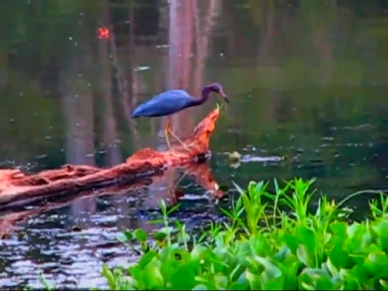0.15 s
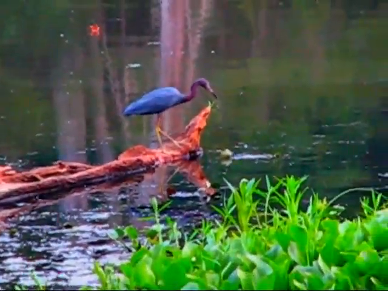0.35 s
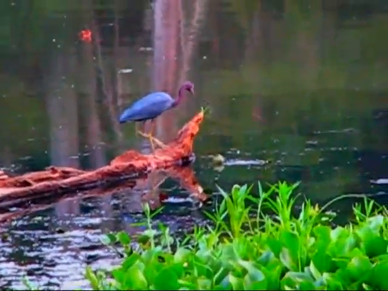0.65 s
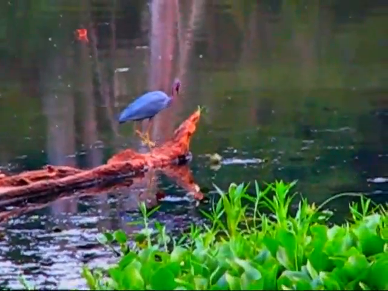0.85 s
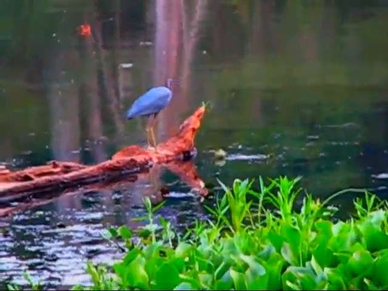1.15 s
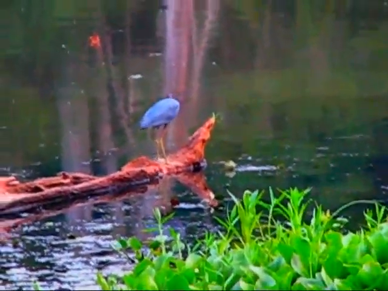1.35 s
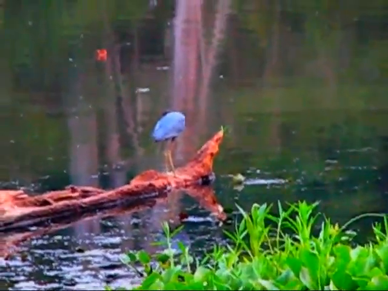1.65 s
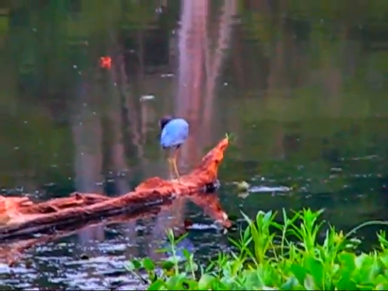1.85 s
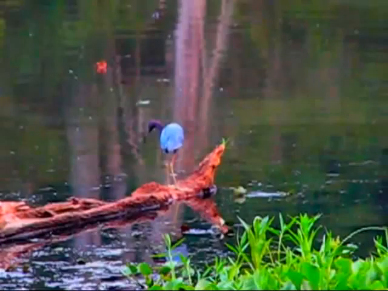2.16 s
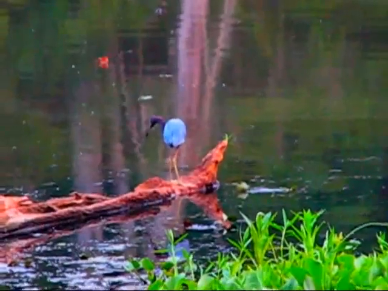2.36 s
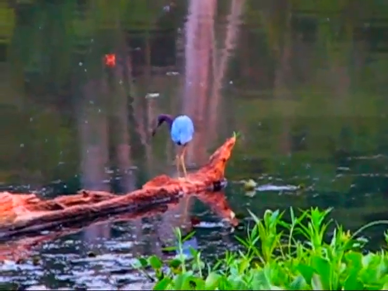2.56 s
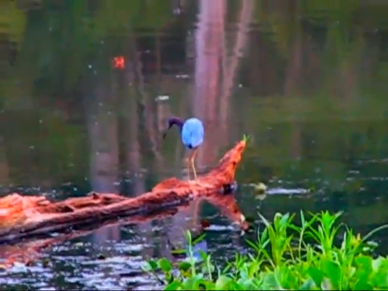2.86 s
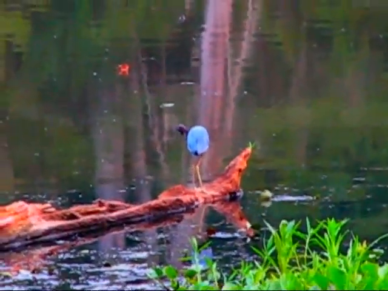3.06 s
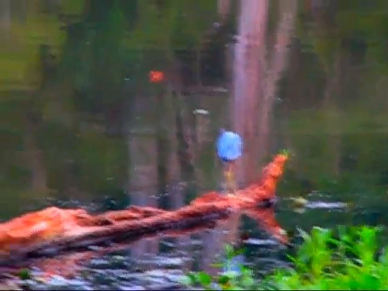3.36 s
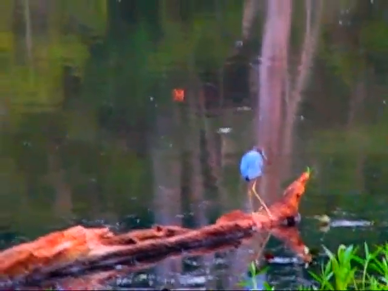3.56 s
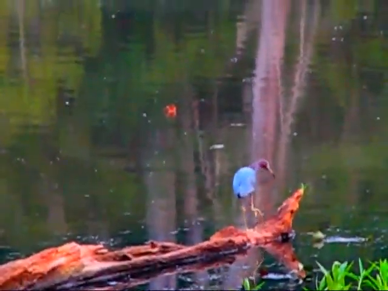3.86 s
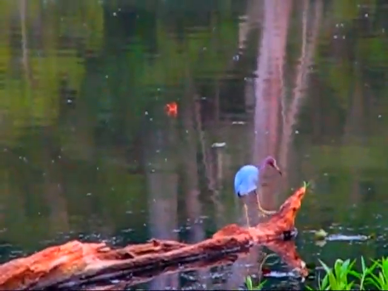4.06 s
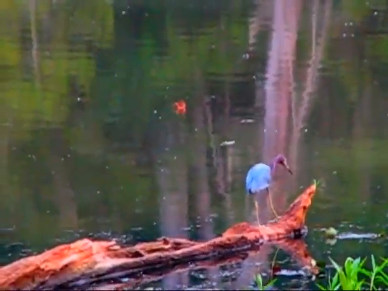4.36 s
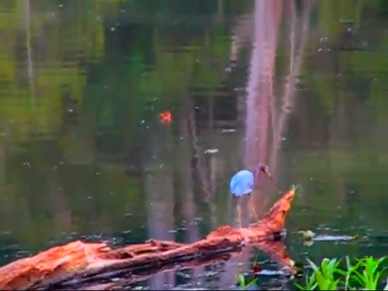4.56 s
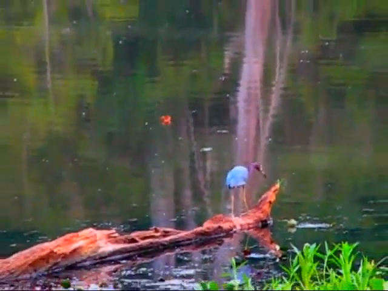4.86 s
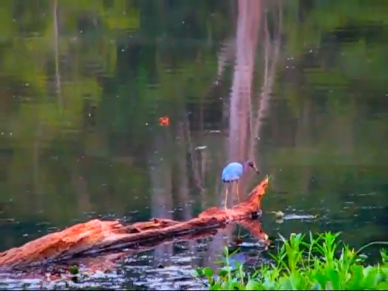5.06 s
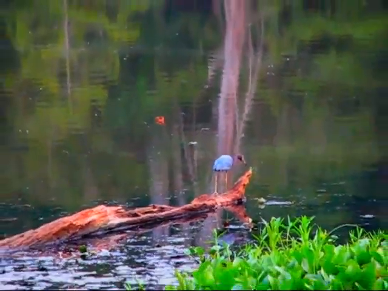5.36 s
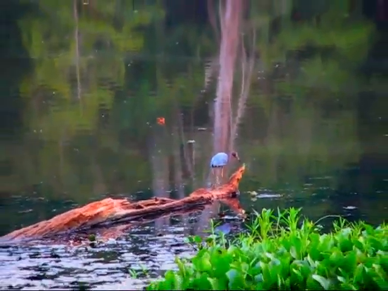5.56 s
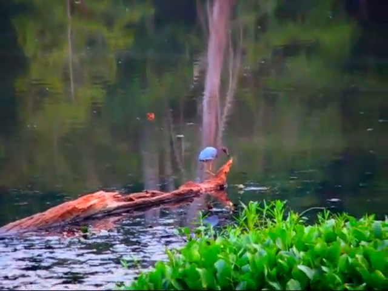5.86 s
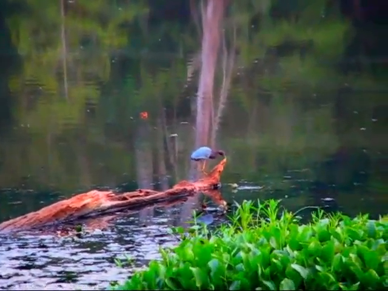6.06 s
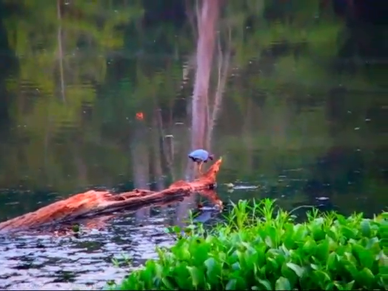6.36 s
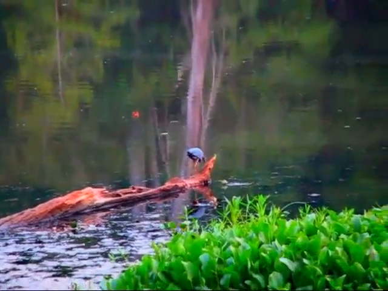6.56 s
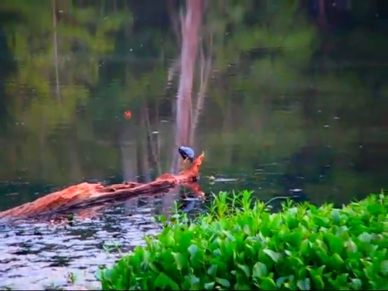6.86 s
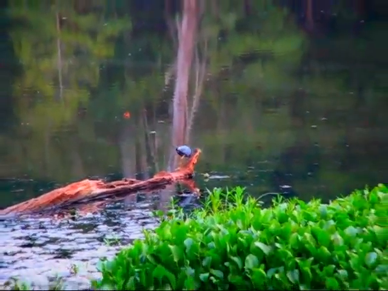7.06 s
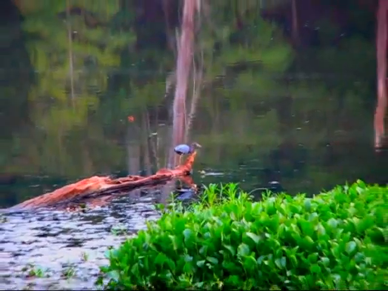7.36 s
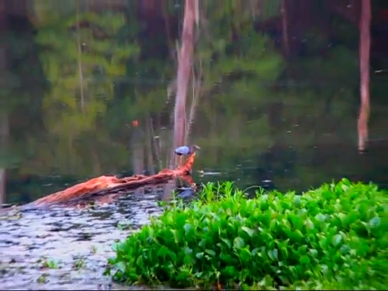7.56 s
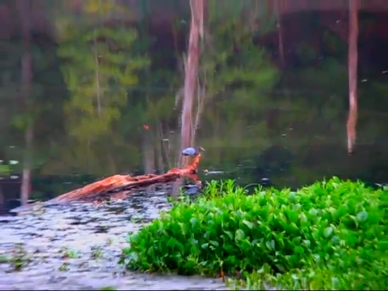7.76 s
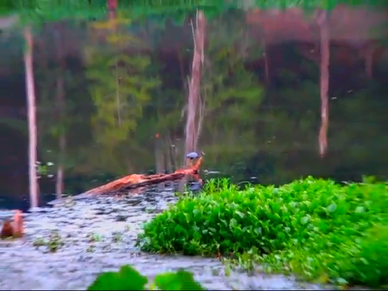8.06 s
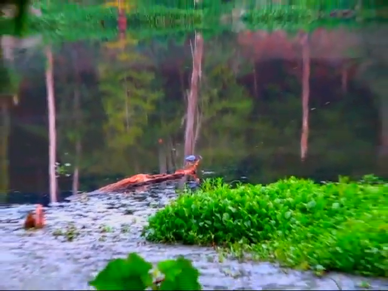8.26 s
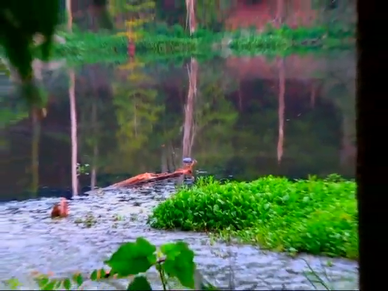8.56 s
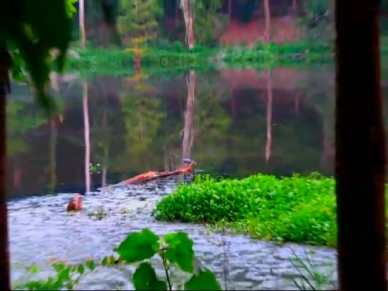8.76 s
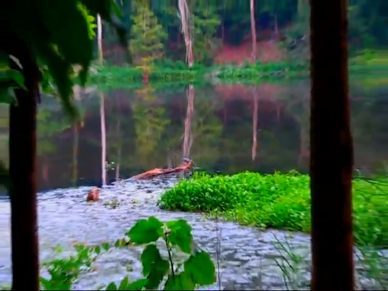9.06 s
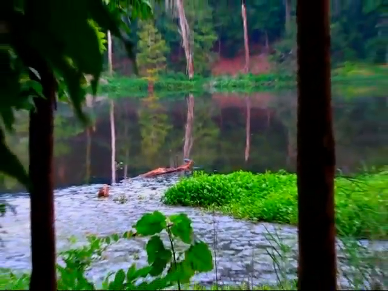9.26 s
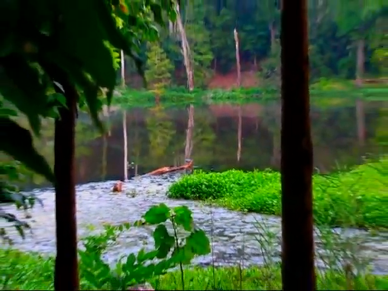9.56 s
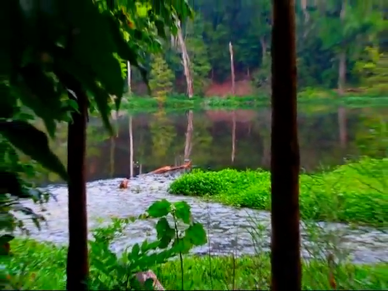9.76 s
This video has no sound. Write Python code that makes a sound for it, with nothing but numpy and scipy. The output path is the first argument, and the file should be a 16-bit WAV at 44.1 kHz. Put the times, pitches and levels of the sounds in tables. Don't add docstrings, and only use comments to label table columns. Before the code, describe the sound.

A continuous, bright insect chorus fills the pond edge, with buzzing cicadas, rapid cricket trilling and very high katydid rasps. Tree frogs give brief reedy chirps over blurred distant callers. Air noise stays very low, with slight gusts. In the later part, close handling clicks lead into a low, uneven zoom-motor whirr with regular gear ticks, and tiny bird whistles appear just before the end.

```python
import sys
import numpy as np
from scipy import signal
from scipy.fft import next_fast_len
from scipy.io import wavfile
from scipy.ndimage import uniform_filter1d

SR = 44100
rng = np.random.default_rng(int(sys.argv[2]) if len(sys.argv) > 2 else 0)


def digitize_waveform(pressure):
    field = np.atleast_2d(pressure).T
    bounded = np.clip(field, -1, 1)
    quanta = np.round(bounded * 32767).astype(np.int16)
    wavfile.write(sys.argv[1], SR, quanta)


N = 437031

# start_s [s], strokes_per_s [1/s]
WING_BEAT = [(.3, 49.7), (.7, 50), (1.1, 49.8), (1.9, 48.7), (2.7, 49.4), (3.1, 51.1), (3.5, 51.7),
             (4.7, 51.6), (5.5, 52.2), (6.3, 51.5), (6.7, 52.4), (7.9, 51.4), (9.1, 52.3), (9.9, 52)]


def gain_of(db):
    return 10 ** (np.asarray(db) / 20)


def evened(x):
    return x / np.sqrt(np.mean(x ** 2) + 1e-20)


def read(points, hz):
    f, value = np.transpose(points)
    return np.interp(np.log(hz + 1), np.log(f + 1), value)


def curve(rows, index):
    rows = np.array(rows)
    return np.interp(np.arange(N) / SR, rows[:, 0], rows[:, index])


def drift(hz):
    low_pass = signal.butter(2, hz, fs=SR, output="sos")
    return evened(signal.sosfilt(low_pass, rng.standard_normal(N)))


def resonate(x, hz, width):
    return signal.lfilter(*signal.iirpeak(hz, hz / width, SR), x)


def resonate_twice(x, hz, width):
    return resonate(resonate(x, hz, width), hz, width)


def bend(x, shift_hz):
    length = x.shape[-1]
    whole = signal.hilbert(x, next_fast_len(length))[..., :length]
    return (whole * np.exp(2j * np.pi * np.cumsum(shift_hz) / SR)).real


def panned(x, db):
    return x * gain_of([[db / 2], [-db / 2]])


def add(mix, s, sound):
    part = mix[:, round(s * SR):][:, :sound.shape[1]]
    part += sound[:, :part.shape[1]]


def song(start, end, db, swell, fade):
    t = np.arange(N) / SR
    away = np.maximum(start - t, 0) / swell + np.maximum(t - end, 0) / fade
    return gain_of(db - 18 * away)


def wash(spectrum, patchy_db):
    # pitch_hz [Hz], likeness [0 to 1]
    likeness = [(30, .55), (130, 0.27), (250, 0.53), (600, 0.35), (1200, 0.82), (2500, 0.29), (5500, 0.28),
                (15000, 0.15)]
    # pitch_hz [Hz], left_minus_right_db [dB]
    lean = [(60, 0.5), (250, 0.5), (1000, 3), (2500, -2.5), (4000, 6.5), (5000, 6.5), (9500, -11),
            (13000, 7)]
    frames, hz = N // 256 + 5, np.fft.rfftfreq(1024, 1 / SR)
    a, b, c, d, patches = rng.standard_normal((frames, 513, 5)).T
    patches = evened(uniform_filter1d(uniform_filter1d(patches, size=8, axis=0), size=20, axis=1))
    same = np.clip(read(likeness, hz), -1, 1)[:, None]
    left = a + 1j * b
    right = same * left + np.sqrt(1 - same ** 2) * (c + 1j * d)
    z = np.array([left, right])
    z *= gain_of(read(spectrum, hz)[:, None] + patchy_db * patches)
    z *= gain_of(np.outer([.5, -.5], read(lean, hz)))[:, :, None]
    return evened(signal.istft(z, nperseg=1024, noverlap=768)[1][:, :N])


def across_water(x, t60, wet_db):
    t = np.arange(SR // 2) / SR
    signs = rng.choice([-1., 1.], (2, len(t)))
    taps = signs * (rng.random((2, len(t))) < 2000 / SR) * gain_of(-60 * t / t60)
    taps /= np.linalg.norm(taps[0])
    return x + gain_of(wet_db) * signal.fftconvolve(x.mean(0)[None], taps, axes=1)[:, :N]


def cicadas():
    # start_s [s], level_db [dB]
    effort = [(0, -22.5), (.6, -20.5), (2.3, -22), (3, -20.5), (5.2, -19.5), (6.1, -20.5), (7.9, -19),
              (9.91, -20.5)]
    # pitch_hz [Hz], level_db [dB per Hz]
    wash_spectrum = [(2240, -33.5), (3800, -13.5), (4830, -3.5), (6140, -1.5), (7180, -6), (7990, -9),
                     (8310, -8.5), (8690, -12.5), (8960, -15.5), (11000, -18.5), (14300, -21),
                     (22000, -120)]
    # pitch_hz [Hz], width_hz [Hz], clicks_per_s [1/s]
    males = [
        (4380, 500, 240),
        (4720, 250, 205),
        (5505, 140, 250),
        (6226, 360, 190),
    ]
    # start_s [s], end_s [s], level_db [dB], swell_s [s], fade_s [s]
    male_songs = [
        [(0, .03, -13, .1, .2), (.4, 2.4, -17, .4, .4), (8.7, 9.9, -18, 1.4, .1)],
        [(.4, 1.35, -21, .5, .9), (2.25, 2.32, -21, 2, .3), (3, 8.8, -25, 3, 3), (8.7, 8.9, -23, 3, 2.5)],
        [(0, .03, -17, .1, .3), (.2, 2.32, -19.5, .5, .15), (8.7, 9.2, -26, 6, 4)],
        [(0, .16, -20, .1, .5), (3.2, 5.3, -25, 1.3, 3), (6.8, 8.8, -25, 3, 1.6)],
    ]
    # start_s [s], pitch_hz [Hz]
    warm_up = [(0, 5050), (.6, 5380), (1.6, 5560), (2.4, 5580)]
    out = gain_of(curve(effort, index=1) + 1.66) * wash(wash_spectrum, patchy_db=1.0)
    tymbal_hz, tymbal_depth = 238, .12
    buzz = np.sin(2 * np.pi * np.cumsum(tymbal_hz * (1 + .06 * drift(25))) / SR)
    out *= 1 + tymbal_depth * buzz
    for k, ((hz, width, rate), songs) in enumerate(zip(males, male_songs)):
        turns = np.cumsum(rate * (1 + .15 * drift(60))) / SR
        clicks = np.diff(np.floor(turns), prepend=0) + 0.048 * rng.standard_normal((2, N))
        voice = evened(resonate_twice(clicks, hz, width))
        if k == 2:
            voice = bend(voice, curve(warm_up, index=1) - hz)
        out += gain_of(-9.5) * np.max([song(*row) for row in songs], axis=0) * voice
    return out


def strokes(rate, hz, fall_hz, duty, uneven_db, loose_hz):
    turns = np.cumsum(rate) / SR
    u = turns % 1 / duty
    through = np.minimum(u, 1)
    size_db, detune = rng.standard_normal((700, 2))[turns.astype(int)].T
    pitch_hz = hz + loose_hz * detune + fall_hz * (.5 - through)
    tone = np.sin(2 * np.pi * np.cumsum(pitch_hz) / SR)
    swell = abs(np.sin(np.pi * through)) ** .72 * (u < 1)
    return evened(tone * swell * gain_of(uneven_db * size_db))


def crickets():
    # start_s [s], level_db [dB]
    trill = [(0.0, -28), (3.06, -23.5), (5.55, -23.5), (5.63, -26), (5.77, -23), (5.99, -25), (8.03, -25),
             (9.63, -26.5), (9.91, -26)]
    # pitch_hz [Hz], strokes_per_s [1/s], level_db [dB]
    far_singers = [
        (7820, 54, -38),
        (8003, 47, -37),
        (8134, 50, -35),
        (8281, 57, -39),
        (8500, 53, -44),
    ]
    near = strokes(curve(WING_BEAT, index=1), hz=7920, fall_hz=1050, duty=.55, uneven_db=.7, loose_hz=40)
    near = gain_of(curve(trill, index=1) - 1.5) * near
    echo_s, echo_db = .0021, -12
    near = near + gain_of(echo_db) * np.roll(near, round(echo_s * SR))
    far = np.zeros(N)
    for hz, rate, db in far_singers:
        level = gain_of(db + .3 * drift(1.5))
        wings = rate * (1 + .03 * drift(1.2))
        far += level * strokes(wings, hz=hz, fall_hz=60, duty=.8, uneven_db=1.2, loose_hz=8)
    near = across_water(panned(near, -3.2), t60=0.45, wet_db=-39)
    return near + across_water(panned(far, 1.2), t60=0.24, wet_db=-6.0)


def katydids():
    # start_s [s], level_db [dB]
    effort = [(0, -33), (.6, -33.5), (2.3, -28), (3, -28.5), (4.66, -32.5), (5.2, -28.5), (6, -29.5),
              (6.4, -31), (8.5, -35.5), (9.91, -32.5)]
    # pitch_hz [Hz], level_db [dB per Hz]
    rasp_spectrum = [(6350, -29), (10800, -4), (11200, -12.5), (12300, 1), (13100, -2.5), (15700, -13)]
    t = np.arange(N) / SR
    throb_db = 1.8 * np.sin(2 * np.pi * 10.0 * t + 4.4 * drift(3.3))
    beat_db = 1.9 * np.sin(2 * np.pi * np.cumsum(curve(WING_BEAT, index=1)) / SR - 1.5)
    return gain_of(curve(effort, index=1) + throb_db + beat_db) * wash(rasp_spectrum, patchy_db=1.5)


def frog_call(length, hz, db, lower_db, sac, chance):
    lower, upper, upper_db, lower_lead, upper_lead = sac
    t = np.arange(0, length, 1 / SR)
    turn = 2 * np.pi * np.cumsum(hz * (1 - .005 * (t / length - .5))) / SR
    partials = [(lower, lower_db, lower_lead), (1, 0, 1), (upper, upper_db, upper_lead)]
    tone = 0
    for (ratio, part_db, lead), phase in zip(partials, chance):
        quaver = 1 + .15 * np.sin(2 * np.pi * 31 * t + 3 * phase)
        swell = np.sin(np.pi * (t / length) ** lead) ** 1.2
        tone = tone + gain_of(part_db) * np.sin(ratio * turn) * quaver * swell
    return panned(gain_of(db + 1.5) * tone, 4 + 2 * chance[3])


def frogs():
    # [dB, lower partial against the pitch]
    passing = [
        (.075, .185, 3171, -22.5, -7),
        (.165, .09, 3050, -44, 13),
    ]
    early = [(.24, .8, 3260, -48, 11), (.55, .12, 3305, -46, 8), (.67, .26, 3300, -36, 5),
             (1.74, .23, 3315, -40, 10), (1.84, .13, 3315, -29, -12), (2.32, .13, 3330, -44, 10),
             (2.48, .115, 3315, -44, 9), (2.72, .2, 3328, -42, 9), (2.83, .12, 3325, -33, -10),
             (2.53, .09, 3160, -44, 11), (2.85, .07, 3120, -42, 11), (2.99, .08, 3150, -44, 11),
             (3.16, .12, 3340, -41, 8), (3.66, .22, 3335, -32, -1)]
    late = [(3.957, .15, 3382, -35, 0), (4.7, .23, 3382, -31, -1), (4.58, .12, 3370, -36, -4),
            (5.465, .21, 3382, -29, -2), (6.24, .13, 3400, -42, 9), (6.37, .18, 3380, -25.5, -9),
            (6.97, .18, 3398, -34, -1), (7.26, .15, 3385, -28.5, -12), (7.752, .045, 3402, -29, -8),
            (7.67, .03, 3400, -40, 13), (8.1, .17, 3388, -29, -12), (8.42, .09, 3402, -34, -2),
            (8.93, .13, 3400, -34, -12), (9.5, .12, 3420, -37, -12), (9.7, .1, 3414, -33, -12)]
    steady = [(1.332, .062, 3246, -46, 10), (3.29, .082, 3211, -31.5, -12), (4.254, .13, 3215, -29, -12),
              (5.05, .15, 3236, -30.5, -12), (5.9, .14, 3235, -34, -3), (6.36, .12, 3234, -45, 10),
              (6.69, .13, 3242, -34, 2), (7.2, .2, 3242, -50, 9), (7.518, .055, 3248, -41, 14),
              (8.275, .065, 3260, -38, 11), (9.02, .11, 3256, -38, 8), (9.51, .12, 3270, -37, -1),
              (9.77, .1, 3255, -41, 7)]
    high = [(0, .06, 4080, -31, -20), (.047, .06, 3985, -26, -20), (.212, .07, 3989, -30, -11),
            (.29, .05, 4050, -32, -20), (.35, .056, 4000, -31, -20), (1.75, .12, 4073, -31, -20),
            (5.86, .062, 4135, -34, -20), (8.085, .085, 3775, -28, -20), (8.26, .15, 3775, -33, -20),
            (9.478, .045, 4100, -24, -20), (9.705, .11, 3740, -29.5, -20)]
    # lower_ratio, upper_ratio [times pitch], upper_db [dB],
    # lower_lead, upper_lead [exponent, under 1 peaks early]
    sacs = [
        (.866, 1.133, -7.5, .7, .45),
        (.888, 1.122, -8, .8, 1),
        (.88, 1.117, -9, .7, .7),
        (.872, 1.14, -4, .55, .8),
        (.625, 1.02, -20, 1, 1),
    ]
    # start_s [s], level_db [dB]
    far_effort = [(0, -25), (1, -26), (2.5, -24.5), (3.5, -25), (5, -26), (6, -27.5), (7.5, -27),
                  (9.3, -28), (9.91, -27)]
    # pitch_hz [Hz], level_db [dB per Hz]
    far_spectrum = [(1120, -33), (1900, -22), (2000, -16.5), (2350, -12.5), (2880, -2), (3140, -5),
                    (3580, -4.5), (4400, -3.5), (5720, -8), (9680, -120)]
    # pitch_hz [Hz], width_hz [Hz], level_db [dB]
    far_notes = [(2965, 70, -43.5), (3697, 30, -45), (5784, 30, -42), (6169, 90, -39), (3380, 50, -45),
                 (3990, 40, -42), (4828, 40, -38), (4990, 60, -37), (5556, 40, -37), (5960, 40, -39)]
    near = np.zeros((2, N))
    for calls, sac in zip([passing, early, late, steady, high], sacs):
        chances = rng.standard_normal((len(calls), 4))
        for (s, length, hz, db, lower_db), chance in zip(calls, chances):
            add(near, s, frog_call(length, hz, db, lower_db, sac, chance))
    far = gain_of(curve(far_effort, index=1) + 2.5) * wash(far_spectrum, patchy_db=1.5)
    for hz, width, db in far_notes:
        hiss = evened(resonate_twice(rng.standard_normal((2, N)), hz, width))
        far += gain_of(db + 2.5 * drift(1.5)) * hiss
    return far + across_water(near, t60=.3, wet_db=-15)


def still_air():
    # start_s [s, at the peak], lift_db [dB]
    gusts = [
        (1, 2),
        (2.44, 5),
        (3.65, 5.5),
        (4.6, 4),
    ]
    # pitch_hz [Hz], level_db [dB per Hz]
    air_spectrum = [(15, -45), (25, -26), (135, -4.5), (413, -2), (630, -7), (893, -2.5), (1310, -10.5),
                    (1460, -5.5), (1820, -10), (2000, -12), (2600, -71), (4400, -120)]
    t = np.arange(N) / SR
    gust_s = 0.26
    lift_db = sum(db * np.exp(-((t - s) / gust_s) ** 2) for s, db in gusts)
    return gain_of(-47.5 + lift_db) * wash(air_spectrum, patchy_db=2.0)


def far_groups():
    # pitch_hz [Hz], width_hz [Hz], start_s [s], end_s [s], level_db [dB]
    groups = [
        (3600, 500, 1.6, 3.4, -31),
        (2340, 270, 4.5, 5.2, -44),
        (3030, 970, 9.8, 9.91, -40),
    ]
    out = np.zeros((2, N))
    for hz, width, start, end, db in groups:
        blur = evened(resonate_twice(rng.standard_normal((2, N)), hz, width))
        out += song(start, end, db, 0.72, 1.0) * blur
    return out


def body_ticks():
    # start_s [s], turn_s [s], peak_db [dB], pitch_hz [Hz]
    catch = (6.237, .494, -15, 1500)
    slips = [0, 0, 0, 0, 0, -.026, 0, 0]
    # start_s [s], peak_db [dB], pitch_hz [Hz]
    loose_ticks = [(2.687, -22, 1710), (3.453, -22, 1060), (5.807, -20, 1900), (5.88, -20, 1200),
                   (5.901, -18, 1300), (5.808, -22, 1300), (5.959, -21, 950), (5.923, -12.5, 920),
                   (5.965, -15, 1300), (6.025, -8.5, 954), (6.474, -19, 1200), (6.577, -22, 830),
                   (6.621, -25, 977), (6.841, -33, 1570), (7.099, -26, 912), (7.387, -23, 1350),
                   (7.455, -23, 1440), (7.637, -24, 1000), (7.692, -23.5, 920), (8.02, -26, 711),
                   (8.335, -20, 1310), (8.534, -19, 1370), (8.651, -22.5, 830), (8.708, -24, 900),
                   (9.785, -17.5, 980), (5.931, -18, 1100), (5.981, -22, 900), (6.043, -20, 1160),
                   (6.341, -20, 280), (6.575, -19.5, 300), (5.858, -30, 860), (5.945, -21, 1250),
                   (6.006, -28, 940), (6.079, -27, 900), (6.177, -30, 929), (6.264, -23, 1060),
                   (6.294, -24, 1200), (6.338, -30, 900), (7.892, -30, 813), (8.052, -24, 1420),
                   (8.084, -27, 910), (8.291, -30, 921), (8.587, -27, 996), (8.802, -25, 942),
                   (9.246, -27, 1320), (9.603, -39, 818), (6.03, -14, 910), (2.693, -27, 1200)]
    # pitch_hz [Hz], left_minus_right_db [dB]
    tick_pan = [(500, 3), (900, 8.5), (1400, -4), (1900, 18)]
    first, turn, catch_db, catch_hz = catch
    ticks = [(first + k * turn + slip, catch_db, catch_hz) for k, slip in enumerate(slips)] + loose_ticks
    out = np.zeros((2, N))
    t = np.arange(2000) / SR
    for (s, db, hz), crackle in zip(ticks, rng.standard_normal((len(ticks), 2000))):
        blow = (crackle + 5 * (t == 0)) * np.exp(-t / .0024)
        width = .22 * hz + .6 * max(hz - 1000, 0) + 350 * (hz < 500)
        ring = resonate(resonate(blow, hz, width), hz, 1.5 * width)
        ring = ring + .22 * resonate_twice(blow, 1.4 * hz, .6 * hz)
        add(out, s, panned(gain_of(db - 3.5) * ring / abs(ring).max(), read(tick_pan, hz)))
    return out


def zoom_motor():
    # pitch_hz [Hz], level_db [dB per Hz]
    body_spectrum = [(53, -46), (90, -14.5), (189, -9), (310, 1), (348, -3), (461, -3.5), (530, -3.5),
                     (850, -1), (918, 0.5), (1070, -2), (1400, 2), (1900, -4.5), (2470, -35), (4180, -120)]
    # pitch_hz [Hz], left_minus_right_db [dB]
    body_pan = [(300, 1), (600, 1), (900, 17.5), (1200, -7), (1500, 0)]
    # start_s [s], length_s [s], from_hz [Hz], to_hz [Hz], level_db [dB]
    scrape = (6.73, .13, 1350, 1700, -36)
    size = gain_of(1.9 * np.minimum(rng.exponential(1, (2, N)), 4))
    teeth = size * (rng.random((2, N)) < 1500 / SR) * rng.choice([-1, 1], (2, N))
    hz = np.fft.rfftfreq(N, 1 / SR)
    response_db = read(body_spectrum, hz) + np.outer([.5, -.5], read(body_pan, hz))
    body = np.fft.rfft(teeth + 1.8 * teeth.mean(0)) * gain_of(response_db)
    low = 1 / (1 + (hz / 520) ** 6)
    rattle = evened(np.fft.irfft(body * (1 - low), N))
    hum = evened(np.fft.irfft(body * low, N))

    t = np.arange(N) / SR
    on = t - 5.89
    run = np.maximum(on, 0)
    jolt_db, jolt_s = 5.5, 0.07
    out = np.clip(on / 0.068 + 0.44, 0, 1) * gain_of(-38 + jolt_db * np.exp(-run / jolt_s)) * rattle
    spin_up_s, peak_s, sag_db = 0.13, 8.26, -1.5
    hum_db = -43 - 14 * np.exp(-run / spin_up_s) + sag_db * (t - peak_s) ** 2
    out += (on > 0) * gain_of(hum_db) * hum

    s, length, from_hz, to_hz, db = scrape
    drag = resonate_twice(teeth[:, :round(length * SR)], from_hz, 300)
    slide_hz = np.linspace(0, to_hz - from_hz, drag.shape[1])
    add(out, s, gain_of(db) * evened(bend(drag, slide_hz)))
    return out


def bird():
    # start_s [s], length_s [s], from_hz [Hz], to_hz [Hz], level_db [dB]
    whistles = [
        (9.475, .045, 4400, 4500, -28),
        (9.505, .04, 4330, 4400, -27),
        (9.485, .085, 3720, 3850, -27),
    ]
    out = np.zeros((2, N))
    for s, length, from_hz, to_hz, db in whistles:
        t = np.arange(0, length, 1 / SR)
        tone = np.sin(2 * np.pi * np.cumsum(np.geomspace(from_hz, to_hz, len(t))) / SR)
        add(out, s, panned(gain_of(db + 3) * tone * signal.windows.hann(len(t)), 7))
    return out


def scene():
    animals = cicadas() + crickets() + katydids() + frogs() + bird()
    return animals + still_air() + far_groups() + body_ticks() + zoom_motor()


def top_cut(x):
    return signal.sosfilt(signal.butter(12, 15590, fs=SR, output="sos"), x)


def record(dry):
    # start_s [s], end_s [s]
    wide_moments = [(.21, .28), (.49, .56), (1.6, 1.67), (1.74, 1.81), (2.39, 2.51), (2.67, 2.74),
                    (3.27, 3.34), (3.69, 3.76), (5.64, 5.71), (5.97, 6.04), (8.61, 8.68), (9.13, 9.24),
                    (9.5, 9.59)]
    # pitch_hz [Hz], width_hz [Hz], change [of the unfolded share]
    exceptions = [(280, 90, -.4), (1750, 350, -.2), (6500, 400, .12), (8050, 200, .37), (9200, 400, .3),
                  (10100, 650, .95), (13000, 600, .4)]
    # start_s [s], pitch_hz [Hz]
    valley = [(0, 1500), (5.8, 1550), (6, 2050), (9.2, 2050), (9.6, 2300)]
    fold_hz, wide_dip_db = 4600, -1.3
    hz, t, z = signal.stft(dry, SR, nperseg=2048, noverlap=1536)
    chance = rng.random((len(t) // 3 + 1, 86)).repeat(3, axis=0)[:len(t)]
    chance = chance.repeat(12, axis=1)[:, :len(hz)]
    wide = sum((t > a) & (t < b + .012) for a, b in wide_moments) > 0
    band = hz // 129 * 129 + 64
    share = .04 + (band < fold_hz)
    share = share + sum(more * np.exp(-((band - f) / width) ** 2) for f, width, more in exceptions)
    unfolded = (chance.T < share[:, None]) | wide
    dipped = z * gain_of(wide_dip_db * wide * (hz[:, None] > .88 * fold_hz))
    z = np.where(unfolded, dipped, gain_of(0.85) * z.mean(0))

    power = uniform_filter1d(uniform_filter1d((abs(z) ** 2).mean(0), size=6, axis=1), size=2, axis=0)
    around = uniform_filter1d(power, size=11, axis=0)
    valley_hz = np.interp(t, *np.transpose(valley))
    starved = .9 * np.exp(-((hz[:, None] - valley_hz) / 460) ** 4)
    masked = power < starved * around
    masked[hz > 15250] |= uniform_filter1d(chance[:, 0], size=4) < .58
    mix = signal.istft(z * ~masked, SR, nperseg=2048, noverlap=1536)[1][:, :N]
    return top_cut(mix)


dry = scene()
out = record(dry)
digitize_waveform(out)
```